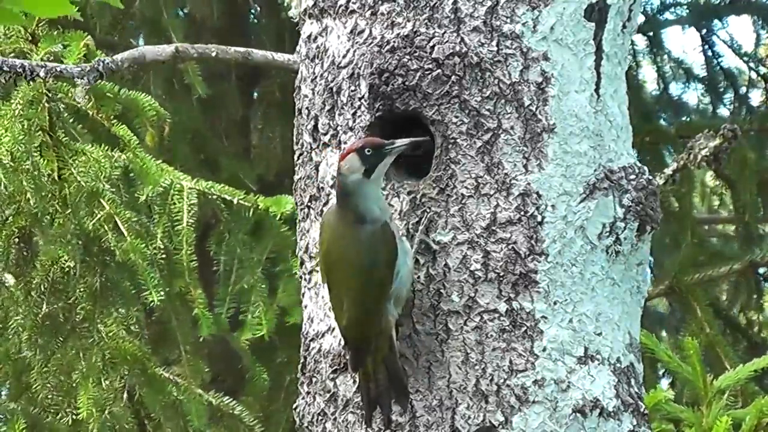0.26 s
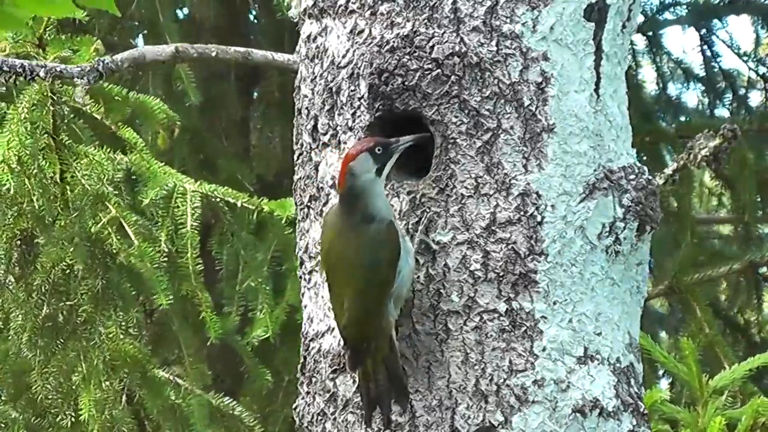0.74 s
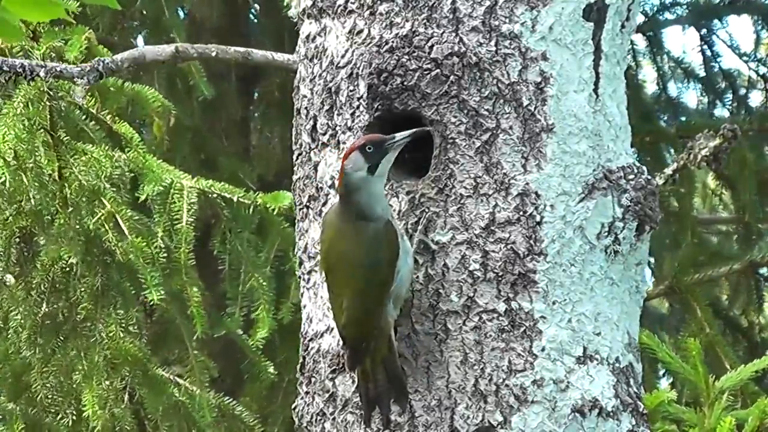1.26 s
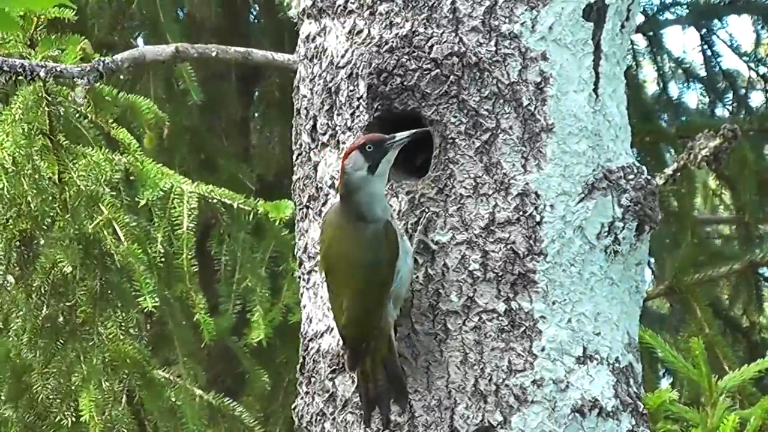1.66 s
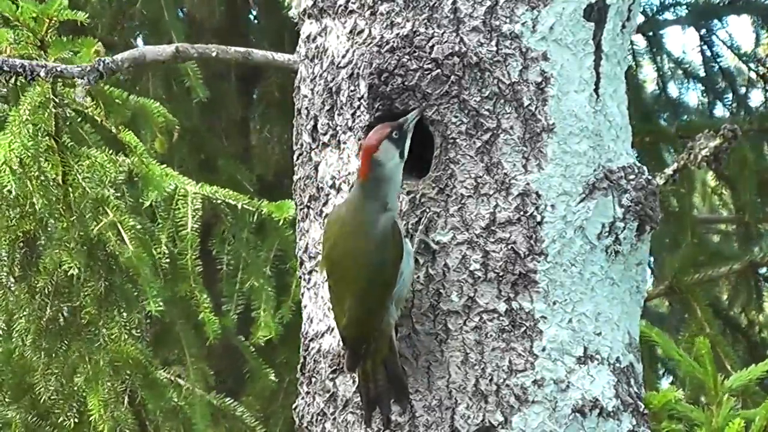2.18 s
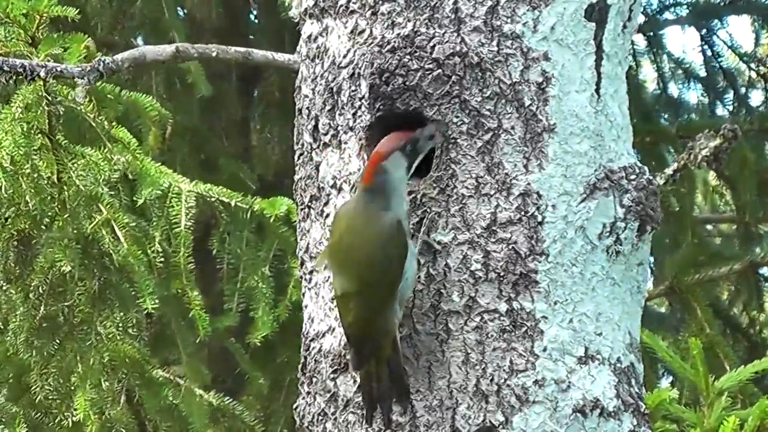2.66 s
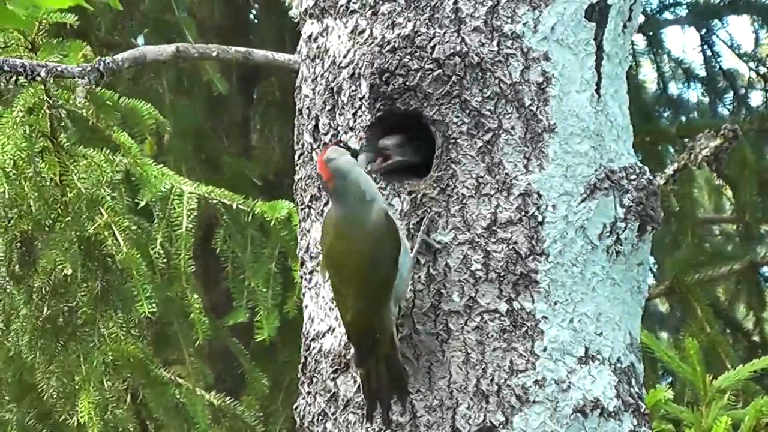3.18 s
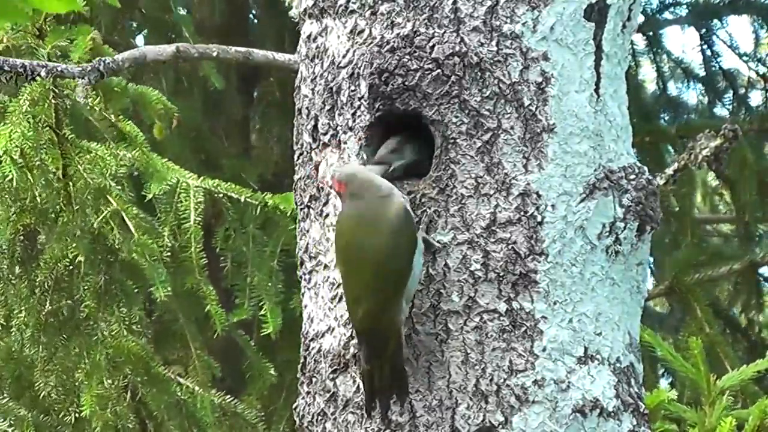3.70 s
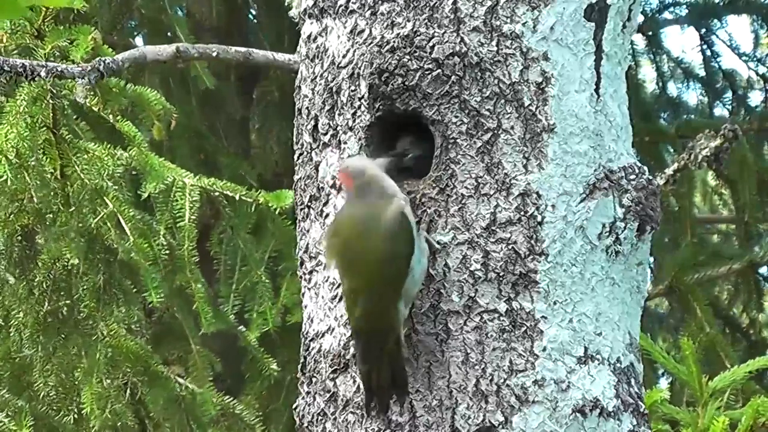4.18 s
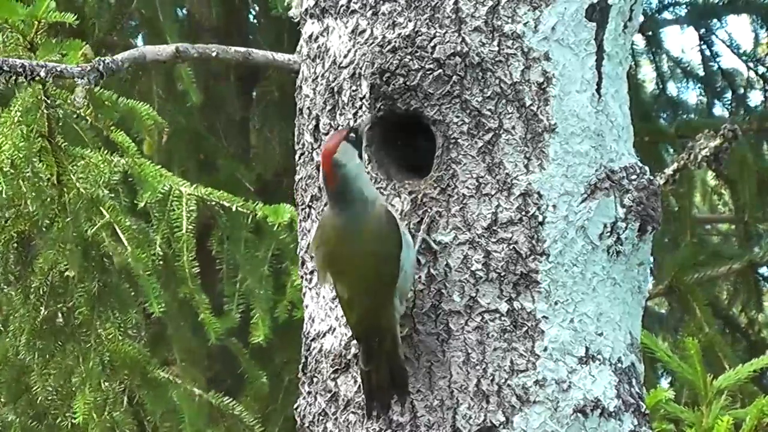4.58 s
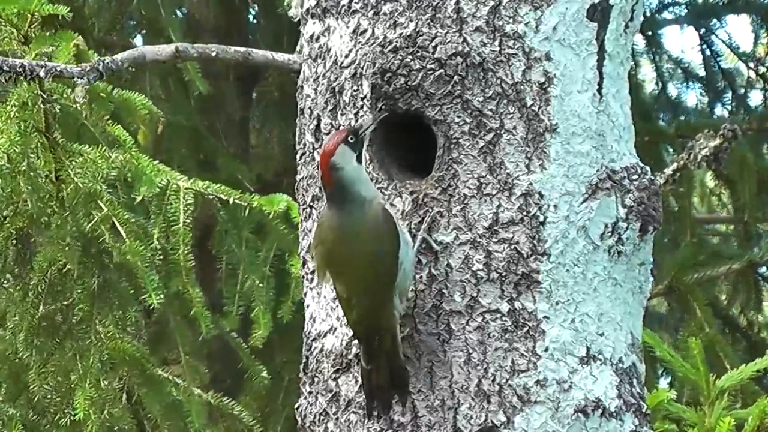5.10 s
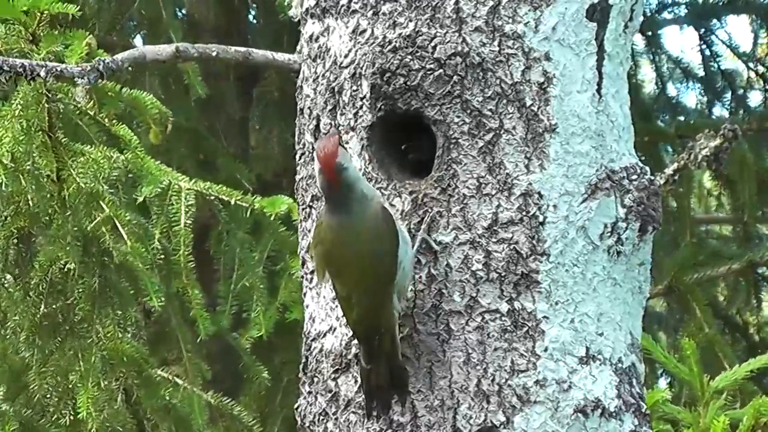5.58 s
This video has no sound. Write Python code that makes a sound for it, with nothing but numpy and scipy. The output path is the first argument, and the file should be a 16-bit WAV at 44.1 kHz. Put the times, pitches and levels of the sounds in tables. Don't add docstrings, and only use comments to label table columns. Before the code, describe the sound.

Fast, buzzy begging calls of a young woodpecker, a short muffled feeding break with faint squeaks, thin songbird whistles, soft forest hush.

```python
import sys
import numpy as np
from scipy import signal
from scipy.fft import rfft, irfft, next_fast_len
from scipy.io import wavfile
from scipy.ndimage import uniform_filter1d, map_coordinates

SR = 44100
rng = np.random.default_rng(int(sys.argv[2]) if len(sys.argv) > 2 else 0)


def how_loud(loudness_db):
    steps = np.asarray(loudness_db, float) / 20
    return 10 ** steps


def file_out(sig):
    cols = np.atleast_2d(sig).T
    lim = np.clip(cols, -1, 1)
    pcm = np.round(lim * 32767).astype(np.int16)
    wavfile.write(sys.argv[1], SR, pcm)


N = 257984
T = np.arange(N) / SR

# centre_hz, width_hz, level_db
CLOSING = [
    [(3823, 480, 4.5), (4425, 610, 4), (5060, 1800, 1.5)],
    [(8360, 1700, 0), (9420, 2000, -1)],
    [(817, 240, -0.69), (1700, 1600, -1.44)],
]


def unit(x):
    return x / np.sqrt(np.mean(x ** 2) + 1e-20)


def along(points, hz):
    f, v = np.transpose(points)
    return np.interp(np.log(hz + 1), np.log(f + 1), v)


def joined(calls):
    s, *columns = np.transpose(np.concatenate(calls))
    gate = sum((T >= call[0][0]) & (T <= call[-1][0]) for call in calls)
    curves = [np.interp(T, s, column) for column in columns]
    return curves + [uniform_filter1d(1. * gate, size=90)]


def wobble(rate):
    return map_coordinates(rng.standard_normal(int(N * rate / SR) + 4), [T * rate])


def filtered(x, response):
    m = 2 * next_fast_len(N // 2 + 4096)
    return irfft(rfft(x, m) * response(np.fft.rfftfreq(m, 1 / SR)), m)[..., :N]


def causal(gain):
    cepstrum = irfft(np.log(gain + 1e-6))
    half = len(cepstrum) // 2
    cepstrum[1:half] *= 2
    cepstrum[half + 1:] = 0
    return np.exp(rfft(cepstrum))


def pulses(pitch_hz, scatter, size_db):
    cycles = np.cumsum(pitch_hz) / SR
    at = np.interp(np.arange(1, int(cycles[-1])), cycles, np.arange(N))
    late, uneven = rng.standard_normal((2, len(at)))
    here = at.astype(int)
    at = np.clip(at + late * scatter[here] * SR / pitch_hz[here], 8, N - 10)
    taps = np.floor(at)[:, None] + np.arange(-7, 9)
    away = taps - at[:, None]
    shape = np.sinc(away) * np.cos(np.pi * away / 16) ** 2
    sizes = -how_loud(uneven * size_db[here]) * np.sqrt(1000 / pitch_hz[here])
    return np.bincount(taps.astype(int).ravel(), (shape * sizes[:, None]).ravel(), N)


def breathy(train):
    return unit(train) + .35 * rng.standard_normal(N)


def throat(train, groups, gains):
    out = np.zeros(N)
    for modes, gain in zip(groups, gains):
        def ring(f):
            power = sum(how_loud(2 * db) * (f * w) ** 2 / ((c * c - f * f) ** 2 + (f * w) ** 2) for c, w, db in modes)
            return causal(power ** 1.067)

        steady, moving = filtered(np.array([train, train * gain]), ring)
        out += moving / np.std(steady)
    return out


def rasp():
    # start_s, attack_s, swell_s, level_after_attack_db, end_level_db
    rasps = [(-.01, 0.011, 0.077, -34, -31), (.205, .011, 0.12, -39.5, -30.5),
             (.455, .014, 0.09, -39.5, -31.5), (.718, 0.036, 0.024, -35.5, -30.5),
             (1.025, 0.044, 0.021, -46.5, -45), (1.28, 0.019, 0.023, -56.5, -48),
             (1.495, .023, .028, -44, -33.5), (1.712, .014, 0.087, -39.5, -30.5),
             (1.96, 0.045, 0.066, -40.5, -33.5), (2.225, .055, 0.038, -38.5, -33.5),
             (2.485, .04, 0.052, -43.5, -30.5), (2.755, 0.019, 0.07, -46.5, -29.5),
             (2.985, .022, 0.077, -48, -29.5), (3.34, .012, .048, -43.5, -49), (3.519, .03, .026, -52, -52),
             (4.471, .026, 0.015, -52, -60), (4.65, 0.011, 0.051, -62, -51), (4.86, 0.017, 0.018, -48, -52),
             (5.035, 0.042, 0.037, -45, -40), (5.318, 0.014, 0.048, -48.5, -38.5),
             (5.587, 0.024, .055, -44, -34), (5.814, 0.019, .02, -43.5, -34)]
    # time_s, main_resonance_hz, side_resonances_re_main_db
    posture = [(0, 4530, -9.5), (.3, 4350, -9), (.52, 4630, -9), (.76, 4680, -10), (1.07, 4380, -6.5),
               (1.31, 4440, 5), (1.53, 4500, -10), (1.78, 4520, -10.5), (2.04, 4368, -7),
               (2.55, 4680, -8.5), (2.82, 4667, -9), (3.04, 4325, -8), (3.38, 4540, -15),
               (3.57, 4300, -4.5), (4.7, 4737, -17), (4.9, 4773, -7.5), (5.36, 4620, -7),
               (5.7, 4596, -11.5)]
    # centre_hz, width_hz, level_db
    gapes = [
        [(3947, 830, 0.5)],
        [(4430, 750, 0.5)],
        [(4990, 830, -3), (6300, 300, -9)],
    ]
    # centre_hz, width_hz, level_db
    sides = [
        [(8220, 2800, 8), (10100, 4700, -4)],
        [(1437, 1670, 19), (2000, 2300, -1.5)],
    ]

    calls = []
    for s, attack, swell, knee_db, end_db in rasps:
        knee, end = s + attack, s + attack + swell
        bend_db = knee_db + 0.44 * (end_db - knee_db)
        calls.append([(s, knee_db - 13.5), (knee, knee_db), (knee + 0.56 * swell, bend_db),
                      (end, end_db), (end + 0.016, end_db - 9)])
    level_db, gate = joined(calls)

    gape_hz, side_db, _ = joined([posture])
    eager_db = 6 / (1 + np.exp((T - 0.63) / 0.055))
    effort_db = level_db + 38.5
    bright_db = side_db - 0.8 + eager_db + 0.01 * effort_db
    low_db = side_db - 0.2057 * effort_db

    ends = np.array([call[-2][0] for call in calls])
    to_go = ends[np.minimum(np.searchsorted(ends, T - .015), len(ends) - 1)] - T
    chaos = np.clip(to_go / .04, .2, 1)
    rate_hz = np.where(to_go < .02, 975, 1190 + 70 * wobble(25))
    train = breathy(pulses(rate_hz * (1 + .03 * wobble(120)), .17 * chaos, 4 * chaos))

    gain = gate * how_loud(level_db + 0.24 * wobble(150))
    near = np.array([0.079 + np.exp(-((gape_hz + 180 * wobble(40) - g[0][0]) / 450) ** 2) for g in gapes])
    near /= np.linalg.norm(near, axis=0)
    gains = [*(gain * near), gain * how_loud(np.minimum(bright_db, 7)), gain * how_loud(low_db)]
    return throat(train, gapes + sides, gains)


def hush():
    # frequency_hz, level_db
    wind = [(15, -55), (25, -23), (55, 3.5), (90, -4.5), (140, 0), (240, -2), (540, -1), (920, -4.5),
            (1310, -9), (2100, -16), (3150, -16), (3600, -11.5), (6400, -11), (10000, -21), (15600, -39)]
    # frequency_hz, coherence_0_to_1
    likeness = [(60, .78), (140, .55), (300, .65), (640, .62), (1400, .6), (3100, .93), (6800, .95),
                (15000, .85)]
    # frequency_hz, phase_rad
    lag = [(70, 2.9), (140, 1.6), (340, .96), (1700, .08), (10000, .01)]
    # frequency_hz, difference_db
    tilt = [(60, -3.7), (130, -3.5), (250, -1.7), (500, .5), (1300, 1.5), (2400, -.8), (8000, -.3)]

    def common(hz):
        return np.clip(along(likeness, hz), 0, 1)

    left, other = rng.standard_normal((2, N))
    right = filtered(left, lambda hz: common(hz) * np.exp(-1j * along(lag, hz)))
    right = right + filtered(other, lambda hz: np.sqrt(1 - common(hz) ** 2))
    pair = filtered(np.array([left, right]),
                    lambda hz: how_loud(along(wind, hz) + np.outer([.5, -.5], along(tilt, hz))))
    return unit(pair) * how_loud(-51 + 0.11 * wobble(2.93))


def forest(x, alike):
    # frequency_hz, time_to_fall_60_db_s
    decay = [(1000, 0.35), (2500, 0.29), (4000, 0.25), (12000, 0.19)]
    step, out = SR // 4, np.zeros((2, N + SR))
    for start in range(0, N, step):
        hz, t, z = signal.stft(rng.standard_normal((2, SR // 3)), SR, nperseg=256)
        fading = z * how_loud(-60 * t / along(decay, hz)[:, None])
        mid, side = signal.istft(fading, SR, nperseg=256)[1]
        tails = np.array([mid + (1 - alike) * side, mid - (1 - alike) * side])
        tails /= np.linalg.norm(tails[0])
        echo = signal.fftconvolve(x[None, start:start + step], tails, axes=1)
        out[:, start + 220:][:, :echo.shape[1]] += echo
    return out[:, :N]


def lock():
    # time_s, peak_db, pitch_hz, length_s, bright_db
    locks = [(0.065, -29, 971, .013, -23), (.085, -45, 867, 0.012, -8), (0.328, -30, 900, .01, -16),
             (.554, -21.5, 977, 0.028, -3.5), (0.785, -46, 977, 0.0073, -17), (1.085, -46, 806, .012, 0),
             (1.326, -33, 802, .02, 3), (1.546, -31.5, 797, 0.0099, -8), (1.827, -20.5, 733, 0.014, -12.5),
             (2.071, -25.5, 805, 0.018, -1.5), (2.32, -22, 796, 0.017, -8.5),
             (2.581, -23, 806.5, 0.01249, -11), (2.852, -25.5, 800, 0.017, -4.5),
             (3.077, -22, 792.4, 0.019, -8.5), (5.116, -32, 884, 0.011, -3), (5.388, -26, 745, 0.0093, -5),
             (5.673, -23.5, 760, 0.019, -7)]
    pitch_hz, gains = np.full(N, 800.), np.zeros((3, N))
    for s, db, hz, length, bright_db in locks:
        span = slice(round((s - 1.5 * length) * SR), round((s + 2.5 * length) * SR))
        u = (T[span] - s) / length
        low_db = -3 - 0.69 * (db + 26.5)
        pitch_hz[span] = hz * (1 + .05 * (.5 - u))
        swell = np.clip(u / 0.13 + 0.49, 0, 1) * np.clip((1.2 - u) / 0.55, 0, 1)
        gains[:, span] += swell * how_loud(db - 8.5 + np.array([[0], [bright_db], [low_db]]))
    train = pulses(pitch_hz * (1 + .007 * wobble(150)), np.full(N, .016), np.full(N, 1.3))
    buzz = throat(breathy(train), CLOSING, gains)
    lopsided = buzz - .22 * np.abs(buzz)
    return filtered(lopsided, lambda hz: 1 / (1 + (560 / (hz + 1)) ** 8))


def whistles():
    # start_s, length_s, level_db, pitch_factor
    chips = [(0.866, 0.093, -56.5, .975), (1.413, 0.071, -52.5, 1.01), (4.395, 0.098, -52.5, 1.012)]
    # share_of_length, pitch_hz, level_db
    course = [
        (0, 8350, -2.5),
        (.2, 8350, -0.5),
        (.27, 7650, 3),
        (.42, 7800, -1.5),
        (.66, 8600, 0.5),
        (.78, 9350, -12),
        (1, 9450, -17),
    ]
    # start_s, length_s, level_db, first_hz, last_hz
    arches = [(4.803, .145, -50.5, 7160, 8250), (5.131, .167, -49, 7060, 7280),
              (5.48, .16, -50, 7440, 8100)]
    notes = []
    for s, length, db, factor in chips:
        notes.append([(s + u * length, hz * factor, db + rel_db) for u, hz, rel_db in course])
    u = np.linspace(0, 1, num=40)
    top_hz, top_at = 8340, 0.68
    for s, length, db, first_hz, last_hz in arches:
        before = np.clip(1 - u / top_at, 0, 1)
        after = np.clip((u - top_at) / (1 - top_at), 0, 1)
        hz = top_hz - (top_hz - first_hz) * before ** 1.7 - (top_hz - last_hz) * after ** 2.6
        notes.append(np.transpose([s + u * length, hz, db - 6 * before ** 2]))
    return notes


def songbird():
    pitch_hz, level_db, gate = joined(whistles())
    tremble_hz = 30 + .11 * np.abs(pitch_hz - 8400)
    turn = 2 * np.pi * np.cumsum(pitch_hz + tremble_hz * wobble(300)) / SR
    flutter_db = 2.4 * wobble(90) + 3 * wobble(35)
    return gate * how_loud(level_db + 3.5 + flutter_db) * np.sin(turn)


def squeaks():
    # start_s, length_s, first_hz, last_hz, level_db
    glides = [(0.886, 0.022, 1370, 2340, -51.5), (1.219, 0.021, 2294, 2490, -43.5),
              (1.23, 0.016, 2457, 2180, -34), (1.24, 0.014, 1160, 940, -45),
              (1.469, 0.019, 2314, 2353, -43.5), (3.562, 0.014, 1946, 1908, -56),
              (3.572, .016, 2583, 2470, -51), (3.709, 0.0091, 2620, 2370, -50.5),
              (3.719, 0.0081, 2110, 1830, -51), (3.8, .015, 2000, 1800, -54.5),
              (3.932, 0.034, 2480, 2450, -56), (4.044, 0.017, 1930, 1800, -57),
              (4.273, .016, 2050, 1800, -56), (4.713, 0.02, 878, 753, -62.5)]
    out, shake = np.zeros(N), wobble(400)
    for s, length, first_hz, last_hz, db in glides:
        drop_db = 3.5 if first_hz < 1000 else -4
        span = slice(round(s * SR), round((s + length) * SR))
        u = (T[span] - s) / length
        waver_hz = (.07 if db < -49.5 else .015) * first_hz * (first_hz > 1500)
        pitch_hz = first_hz + (last_hz - first_hz) * u + waver_hz * shake[span]
        turn = 2 * np.pi * np.cumsum(pitch_hz) / SR
        count = 3 + (first_hz > 2200 or first_hz < 1100)
        tones = sum(how_loud(k * drop_db) * np.sin((k + 1) * turn) for k in range(count))
        out[span] += how_loud(db) * np.sqrt(np.abs(np.sin(np.pi * u))) * tones
    return out


def rustle():
    # time_s, level_db
    moves = [(3.07, -66), (3.1, -49), (3.15, -52.5), (3.2, -52), (3.26, -62), (3.3, -61)]
    # frequency_hz, level_db
    bark = [(150, -43), (260, 2), (400, 8), (650, -3), (1100, -47)]
    level_db, gate = joined([moves])
    scrape = unit(filtered(rng.standard_normal(N), lambda hz: how_loud(along(bark, hz))))
    return gate * how_loud(level_db - 4.0 + 2.1 * wobble(29.7)) * scrape


def squawk():
    # time_s, pitch_hz, level_db, scatter_0_to_1
    course = [(3.236, 430, -50, .07), (3.25, 580, -39, .025), (3.268, 675, -36.5, .01),
              (3.272, 768, -38.5, .13), (3.295, 771, -36.5, .13), (3.299, 800, -36.5, .035),
              (3.326, 900, -35, .09), (3.331, 686, -31, .04), (3.348, 725, -36, .02)]
    # centre_hz, width_hz, level_db
    wide = [(3510, 770, -1.5), (4300, 1400, -1)], [(5300, 1700, 0)], [(800, 690, 2.5), (1800, 1370, 2),
            (2750, 560, -4)]
    pitch_hz, level_db, scatter, gate = joined([course])
    before_gulp = T < 3.329
    low_db = np.where(before_gulp, -6, -11)
    bright_db = np.where(before_gulp, -4.5, -7.5)
    train = pulses(pitch_hz, scatter, 1 + 14 * scatter)
    gain = gate * how_loud(level_db)
    gape = np.clip((T - 3.285) / 0.085, .05, .9)
    gains = [gain * (1 - gape), gain * gape, gain * how_loud(low_db), gain * how_loud(bright_db)]
    return throat(train, [*wide, CLOSING[1]], gains)


def scene():
    # frequency_hz, level_db
    apart = [(600, -11), (1200, -14), (2000, -18), (4000, -32), (8000, -15), (11000, -21), (15000, -22)]
    # time_s, level_above_11_khz_db
    facing = [(0, -7), (1, -4.5), (2.5, 4.5), (3.5, 3), (5.5, 8.5)]
    chick = rasp() + lock() + squawk() + squeaks() + rustle()

    def treble_and_side(hz):
        return np.array([1 / (1 + (11000 / (hz + 1)) ** 12), np.exp(1.3j) * how_loud(along(apart, hz))])

    treble, side = filtered(chick, treble_and_side)
    chick = chick + (how_loud(np.interp(T, *np.transpose(facing))) - 1) * treble
    near = chick + np.array([side, -side]) + how_loud(-10) * forest(chick, alike=0.79)
    bird = songbird()
    pair = np.array([np.roll(bird, shift=1), bird])
    far = pair * how_loud([[-1.5], [1.5]]) + forest(bird, alike=0.79)
    return near + far + hush()


def roll_off(x):
    return signal.sosfilt(signal.butter(12, 15740, fs=SR, output="sos"), x)


def record(dry):
    # frequency_hz, level_db
    capsule = [(11000, 0.5), (13500, 1), (15500, -11)]
    mix = filtered(dry, lambda hz: how_loud(along(capsule, hz)) * (hz < 15740))
    return roll_off(mix)


dry = scene()
out = record(dry)
file_out(out)
```